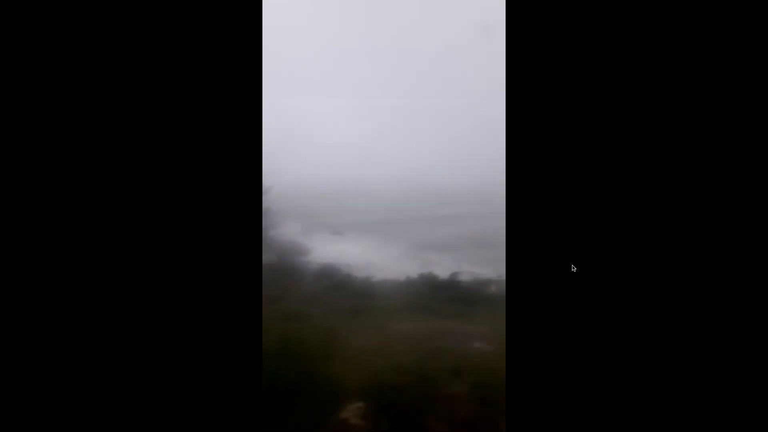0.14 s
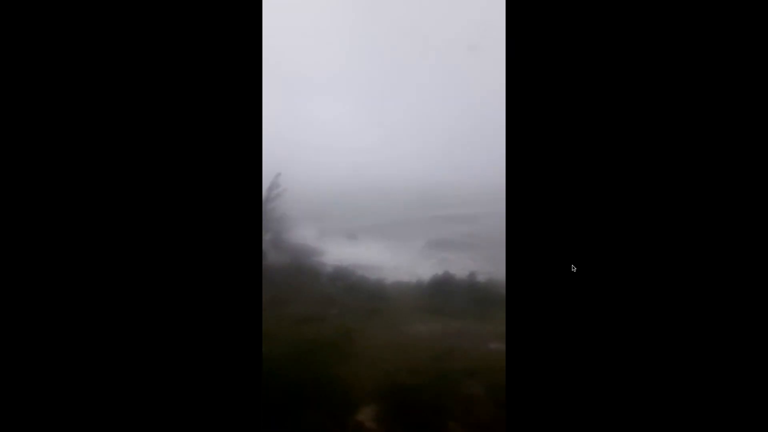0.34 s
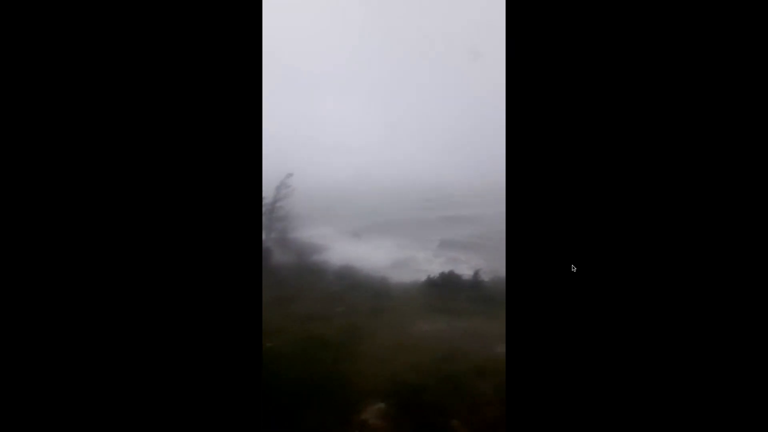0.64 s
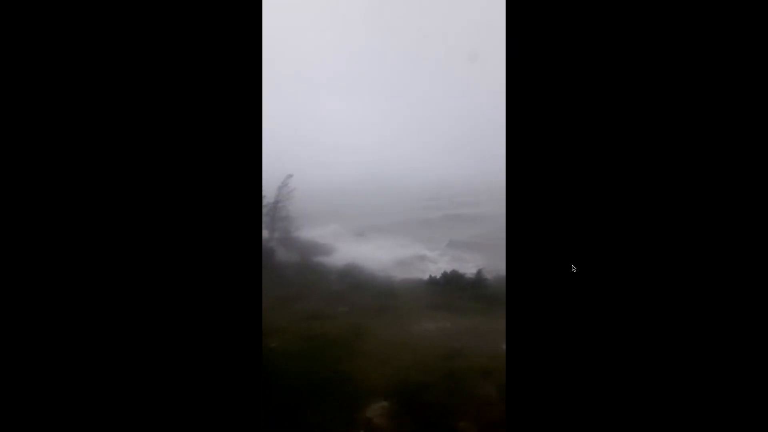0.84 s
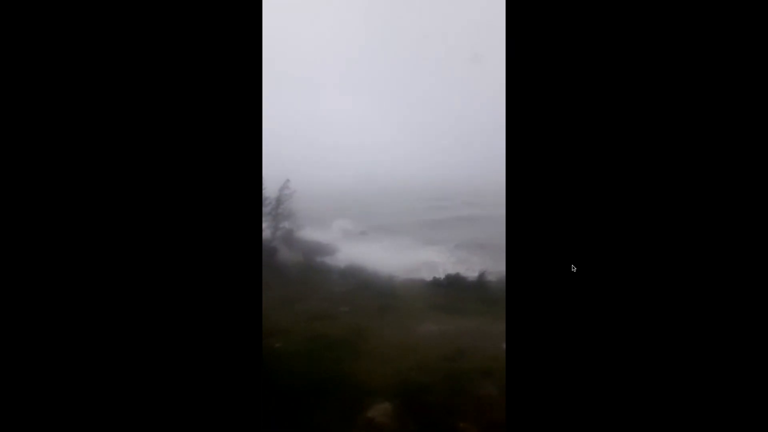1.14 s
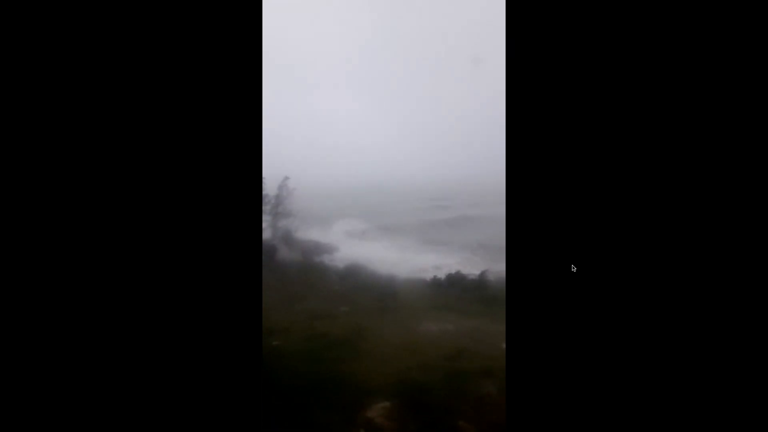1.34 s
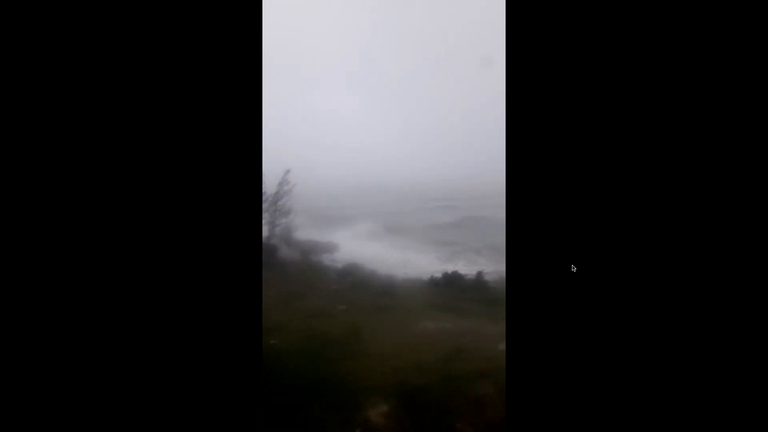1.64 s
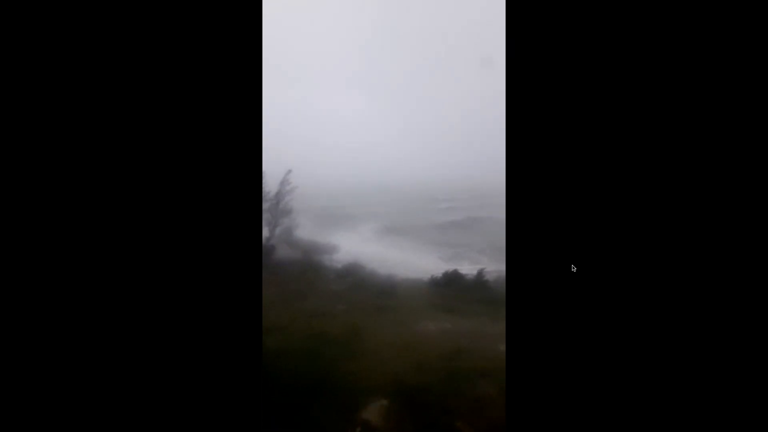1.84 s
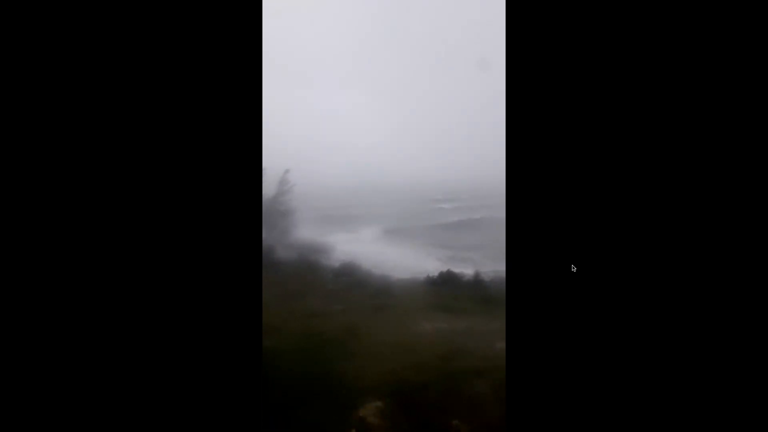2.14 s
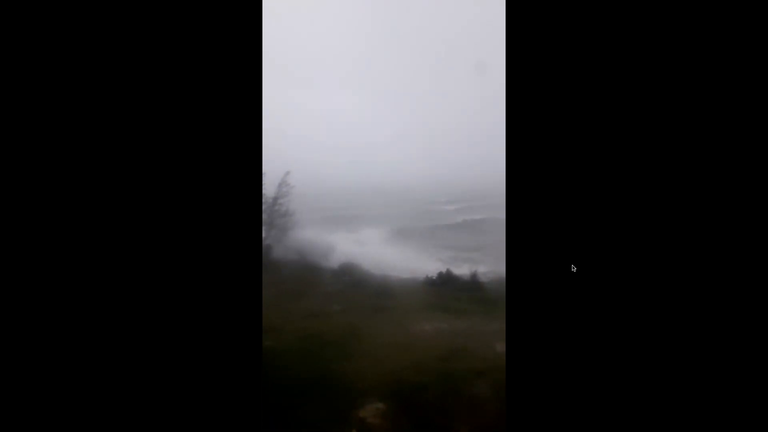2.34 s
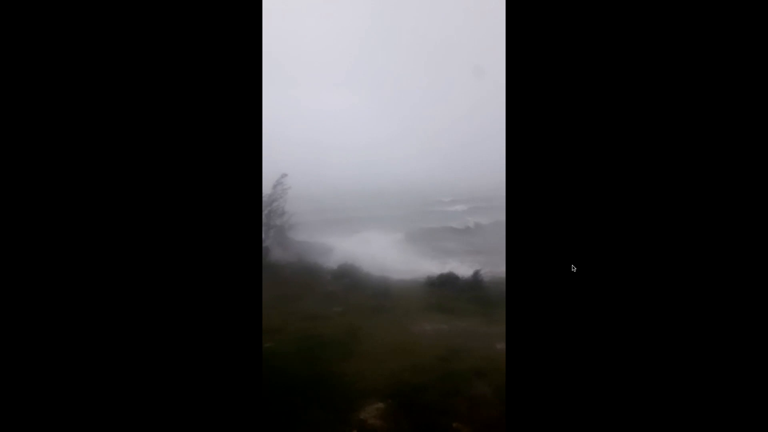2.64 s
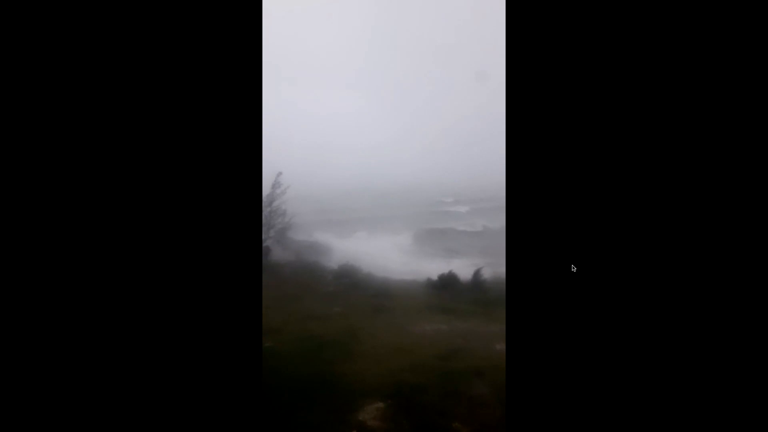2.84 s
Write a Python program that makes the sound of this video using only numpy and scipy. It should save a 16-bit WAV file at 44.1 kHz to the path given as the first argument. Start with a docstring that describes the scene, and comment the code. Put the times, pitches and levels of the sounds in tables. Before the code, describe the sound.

Storm wind blows over a shore, close on a small cased microphone. From 0 to 0.75 seconds ragged gusts crackle and flutter, strongest near 0.3, with a hissy flare just after and short hollow buffets. From 0.8 to 1.9 it eases to a low, smooth roar of wind and surf with small ticks. A sharp, brighter gust surges from 1.95 to 2.4, then subsides until 3.

```python
"""Storm wind on a shore, heard by a small microphone inside a casing.
Noise for the turbulence and a steady spray hiss ring the casing's fixed resonances; its level and treble
change in gusts, and eddies add short puffs. Buffets are short swelling tones.
Underneath lies a low roar of wind and surf, made of smooth noise bands."""
import sys
import numpy as np
from scipy import signal
from scipy.io import wavfile
from scipy.ndimage import uniform_filter1d

SR = 44100
rng = np.random.default_rng(int(sys.argv[2]) if len(sys.argv) > 2 else 0)


def invert_db(level):
    """Linear amplitude ratio for a level in decibels (20 dB per decade), elementwise."""
    return 10 ** (np.asarray(level, dtype=float) / 20)


def bounce(signal):
    """Save signal as a 16-bit WAV file at the path given by the first command-line argument."""
    frames = np.transpose(np.atleast_2d(signal))
    limited = np.clip(frames, -1, 1)
    pcm = np.round(limited * 32767).astype(np.int16)
    wavfile.write(sys.argv[1], SR, pcm)


N = 132300  # length in samples: 3 s

# Gusts of wind over the casing: [t/s, force/dB, fineness (treble against middle)/dB]
GUSTS = [(0.0, -22, -26), (0.07, -30.5, -27), (0.08, -34, -9), (0.14, -27.5, -32), (0.16, -17.5, -27.5),
         (0.21, -26.5, -17.5), (0.29, -14, -32.5), (0.34, -24.5, 9.5), (0.41, -21.5, 5), (0.46, -31.5, -5),
         (0.51, -26, -29), (0.54, -20.5, -27.5), (0.56, -22.5, -24.5), (0.68, -31, -24), (0.74, -26.5, -30),
         (1.2, -29.5, -29), (1.23, -28.5, -37.5), (1.44, -36.5, -42), (1.865, -34.5, -26.5),
         (1.89, -37.5, -3), (1.96, -20, -4.5), (2.08, -23, -19), (2.095, -19, -7), (2.13, -17, -25.5),
         (2.21, -20, -4), (2.25, -26.5, 1), (2.28, -23.5, -7), (2.325, -33, -12), (2.34, -25.5, -12.5),
         (2.4, -29, -16), (2.6, -36, -28.5), (2.7, -28.5, -25.5), (2.87, -29.5, -34.5), (3.0, -35, -2)]
MEAN_FINENESS_DB = -12
# How far each region follows the fineness: [f/Hz, share/1]
FINENESS_SHARE = [(700, 0.26), (2000, 0.22), (4300, 0.33), (7000, 0.76), (9500, 0.88), (14000, 0.6)]
# Colour of the turbulence: [f/Hz, level/dB]
TURBULENCE_COLOUR = [(700, 6), (1200, 10.5), (1700, 18), (3000, 18.5), (5500, 15.5), (7000, -1.5),
                     (9500, 9), (12000, 3.5), (15000, 0)]
# Resonances of the casing: [f/Hz, width/Hz, level/dB]
CASING_RESONANCES = [(762, 115, -4.5), (1284, 30, -8), (1707, 55, -7.5), (1793, 95, 1), (1981, 163, 1),
                     (2276, 254, -6.5), (2750, 62, -4.5), (3754, 160, -10.5), (4316, 296, -2.5),
                     (4564, 160, -7.5), (5364, 114, -4), (5600, 183, -4), (6735, 137, -11),
                     (7480, 250, -12.5), (8920, 214, -7), (9460, 115, -3), (9670, 123, -13),
                     (10000, 370, -8), (10150, 310, -12.5), (10620, 106, -8.5), (11620, 160, -9.5)]
# Single eddies that blow one part of the casing: [t/s, added gain before rise and decay/dB, f/Hz, decay/s]
SINGLE_EDDIES = [(0.078, 20, 9400, 0.007), (0.262, 17, 6030, 0.012), (0.314, 14, 13700, 0.0091),
                 (0.357, 14.5, 4160, 0.0042), (0.367, 4, 6070, 0.005), (0.438, 8, 11100, .04),
                 (1.17, 23.5, 10400, 0.0057), (1.23, 18.5, 1710, 0.0063), (1.544, 9, 3960, 0.018),
                 (1.737, 25, 4950, 0.0077), (1.952, 7, 13500, 0.017), (2.09, -15, 9300, 0.048),
                 (2.135, 8.5, 4830, 0.038), (2.329, 10.5, 4870, 0.059), (2.348, 20, 2750, 0.019),
                 (2.912, 11, 2750, 0.16), (2.942, 17.5, 4150, 0.025)]
PUFF_OCTAVES, PUFF_RISE_S = 0.17, 0.0015  # spread around the centre, time constant of the rise
# EDDY_DB is the rise per unit of swell; each user takes a share of it
EDDIES_PER_S, EDDY_DB, EDDY_DECAY_S = 40, 3.5, 0.0055
OWN_FLICKER_DB, OWN_EDDIES = 2, 0.29  # each resonance: size of its flicker, share of its own eddies
HISS_DB = -49.5  # steady far spray, before the filter that brightens it
CASING_LEAK_DB, SMALL_MODES_T60_S = -23, 0.16
# Buffets, each a swelling tone: [t/s, peak level/dB, f/Hz, half-length/s]
BUFFET_TONES = [(0.161, -15.5, 1960, 0.0041), (0.225, -26, 149, 0.046), (0.279, -10, 2027, 0.0075),
                (0.29, -11.5, 1980, 0.0042), (0.539, -9.5, 1985, 0.0029), (0.665, -24.5, 330, 0.0096),
                (0.748, -18, 1980, 0.0032), (0.82, -18.5, 147, 0.008), (1.548, -24.5, 4200, 0.0028),
                (1.958, -14, 2080, 0.0027), (1.963, -18, 735, 0.0018), (1.967, -14, 890, 0.00093),
                (1.968, -10.5, 1990, 0.0033), (2.085, -27.5, 163, 0.017), (2.106, -7, 2027, 0.0037),
                (2.355, -28, 140, 0.031)]
# Roar of wind and surf over time: [t/s, level/dB]
ROAR_LEVEL = [(0.0, -28.5), (0.13, -33.5), (0.22, -28.5), (0.43, -32), (0.79, -30), (0.84, -31),
              (1.46, -37.5), (1.89, -34.5), (1.98, -31), (2.39, -29.5), (2.62, -34), (3.0, -33)]
# Colour of the roar: [f/Hz, level/dB]
ROAR_TONE_COLOUR = [(25, -22), (80, -26), (115, -10.5), (150, 3), (195, -13), (240, -8.5), (330, -8),
                    (400, -11.5), (560, -16), (780, -14.5), (900, -26.5), (1300, -25.5)]
ROAR_FLICKER_DB = 1.5  # per unit of drift
# Hollows in the casing's response: [f/Hz, width/Hz]
CASING_HOLLOWS = [(845, 50), (1075, 128), (1550, 70)]
MICROPHONE_TOP_HZ = 14200
OVERLOAD = 1.2  # ceiling towards which peaks are rounded


def wind_on_casing():
    """Turbulence, flickering band by band, rings the casing with the force of the gust."""
    force_db, fineness_db = in_time(GUSTS)
    shared_eddies = eddies()
    # the difference of neighbouring samples makes the hiss brighter
    hiss = invert_db(HISS_DB) * signal.lfilter([1, -1], [1], rng.standard_normal(N))
    air = puffed_air = hiss
    for hz, noise in bands(low_hz=631.0, count=33, order=7):
        treble_db = at_hz(FINENESS_SHARE, hz) * (fineness_db - MEAN_FINENESS_DB)
        level_db = force_db + at_hz(TURBULENCE_COLOUR, hz) + treble_db
        band = noise * invert_db(level_db + 0.077 * shared_eddies + 1.2 * eddies())
        air = air + band
        puffed_air = puffed_air + band * puffs(hz)
    return casing(air, puffed_air)


def casing(air, puffed_air):
    """Steep main resonances, each blown unevenly, over a ragged crowd of small modes."""
    t = np.arange(SR // 10) / SR
    # fading noise stands for many small modes ringing together
    crowd = rng.standard_normal(len(t)) * invert_db(-60 * t / SMALL_MODES_T60_S)
    crowd = crowd / np.sqrt(np.sum(crowd ** 2))
    out = invert_db(CASING_LEAK_DB) * signal.fftconvolve(puffed_air, crowd)[:N]
    for hz, width, db in CASING_RESONANCES:
        uneven_db = OWN_FLICKER_DB * drift(31.0) + OWN_EDDIES * eddies()
        blown = invert_db(db + uneven_db) * puffs(hz)
        # two peaks in a row make the flanks steep
        out += resonance(blown * resonance(air, hz, 2 * width), hz, width)
    return out


def puffs(hz):
    """Extra gain near hz: each single eddy rises quickly and then dies away."""
    gain = np.ones(N)
    for s, db, centre_hz, decay in SINGLE_EDDIES:
        start = int(s * SR)
        age = np.arange(min(N - start, SR // 4)) / SR
        octaves_away = np.log2(hz / centre_hz)
        near = np.exp(-.5 * (octaves_away / PUFF_OCTAVES) ** 2)
        shape = (1 - np.exp(-age / PUFF_RISE_S)) * np.exp(-age / decay)
        gain[start:start + len(age)] += invert_db(db) * near * shape
    return gain


def eddies():
    """Random swells in dB that rise quickly and die away."""
    strength = np.minimum(rng.exponential(1, N), 2.2)
    starts = (rng.random(N) < EDDIES_PER_S / SR) * strength + 1e-18
    swell = signal.lfilter([1], [1, -np.exp(-1 / (EDDY_DECAY_S * SR))], starts)
    swell = uniform_filter1d(swell, size=SR // 250)  # soften over 4 ms
    return EDDY_DB * (swell - swell.mean())


def buffets():
    """Short tones that swell and fade in a bell shape, one for each buffet."""
    t = np.arange(N) / SR
    out = np.zeros(N)
    for s, db, hz, half in BUFFET_TONES:
        bell = np.exp(-.5 * ((t - s) / half) ** 2)
        out += invert_db(db) * bell * np.sin(2 * np.pi * hz * (t - s))
    return out


def roar():
    """Wind and surf as low smooth noise, with a slight flicker in each band."""
    level_db, = in_time(ROAR_LEVEL)
    together = drift(4.1)
    low = np.zeros(N)
    for hz, noise in bands(low_hz=21.72, count=24, order=4):
        flicker_db = ROAR_FLICKER_DB * (0.37 * together + drift(6.6))
        low += noise * invert_db(at_hz(ROAR_TONE_COLOUR, hz) + flicker_db)
    return invert_db(level_db) * rms_one(low)


def resonance(x, hz, width):
    """Ringing at one frequency: a two-pole peak with gain 1 on top; a wider peak rings for less time."""
    r = np.exp(-np.pi * width / SR)
    top = np.array([1, 0, -1]) * (1 - r * r) / 2
    return signal.lfilter(top, [1, -2 * r * np.cos(2 * np.pi * hz / SR), r * r], x)


def bands(low_hz, count, order):
    """Bands of noise, order to the octave, with their centres; neighbours are unrelated."""
    edges = low_hz * 2 ** (np.arange(count + 1) / order)
    white = rng.standard_normal((2, N + 4000))  # two noises, used in turn
    for k in range(count):
        sos = signal.butter(2, edges[k:k + 2], "band", fs=SR, output="sos")
        noise = signal.sosfilt(sos, white[k % 2])[4000:]  # skip the filter's start
        yield np.sqrt(edges[k] * edges[k + 1]), noise


def drift(rate):
    """Slow random wandering of rms 1: noise through two low-pass poles at rate, in Hz."""
    # worked out at every 40th sample, then joined by straight lines
    r = np.exp(-80 * np.pi * rate / SR)
    white = rng.standard_normal(N // 40 + 2002)
    slow = signal.lfilter([1], [1, -2 * r, r * r], white)[2000:]
    return np.interp(np.arange(N) / 40, np.arange(len(slow)), rms_one(slow))


def rms_one(x):
    """Scale to rms 1."""
    return x / np.sqrt(np.mean(x ** 2) + 1e-20)


def in_time(rows):
    """Columns of a table as curves, one value per sample."""
    s, *columns = np.transpose(rows)
    return [np.interp(np.arange(N) / SR, s, c) for c in columns]


def at_hz(points, hz):
    """Read a table on a log-frequency axis."""
    table_hz, values = np.transpose(points)
    return np.interp(np.log(hz), np.log(table_hz), values)


def scene():
    """Wind on the casing and its buffets over the roar, in one channel."""
    return (wind_on_casing() + buffets() + roar())[None]


def top_cut(x):
    """Nothing passes above the cut-off."""
    return signal.sosfilt(signal.butter(12, 15690, fs=SR, output="sos"), x)


def record(dry):
    """The casing weakens a few narrow regions, peaks are rounded and the microphone's top rolls off."""
    for hz, width in CASING_HOLLOWS:
        dry = dry - 0.85 * resonance(dry, hz, width)
    rounded = OVERLOAD * np.tanh(dry / OVERLOAD)
    roll_off = signal.butter(6, MICROPHONE_TOP_HZ, fs=SR, output="sos")
    mix = signal.sosfilt(roll_off, rounded)
    return top_cut(mix)


dry = scene()
out = record(dry)
bounce(out)
```